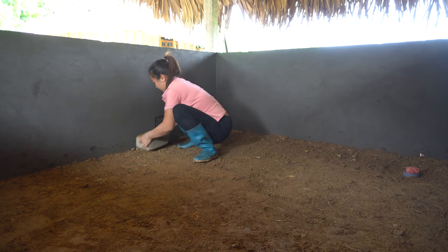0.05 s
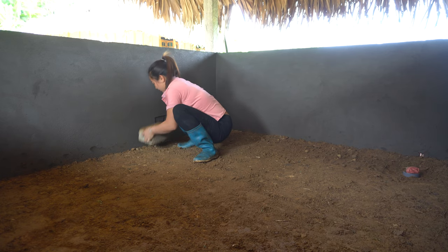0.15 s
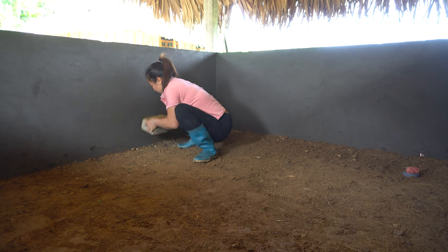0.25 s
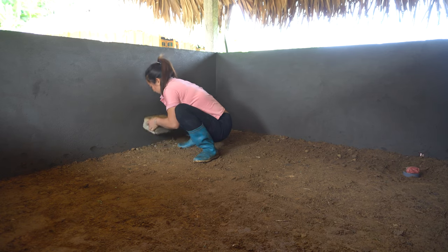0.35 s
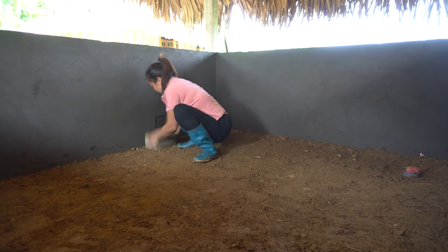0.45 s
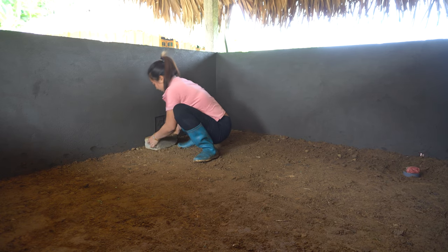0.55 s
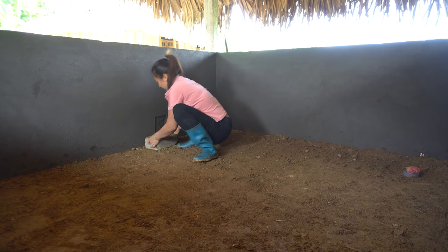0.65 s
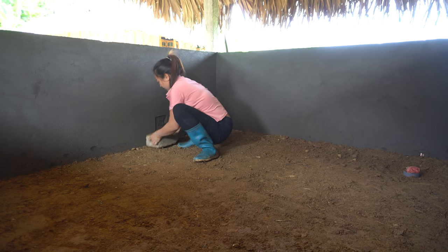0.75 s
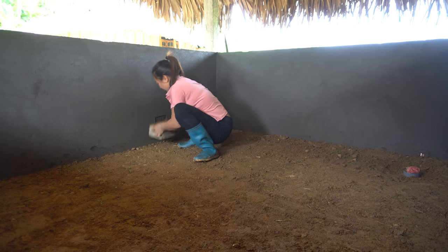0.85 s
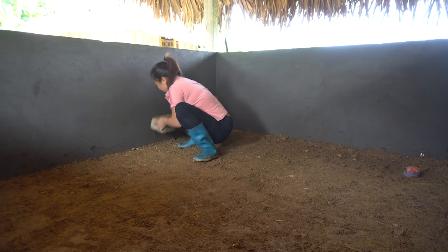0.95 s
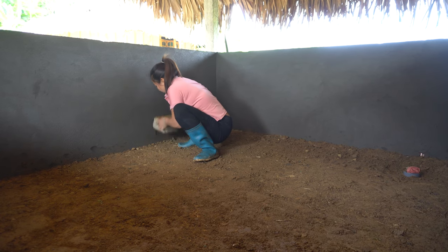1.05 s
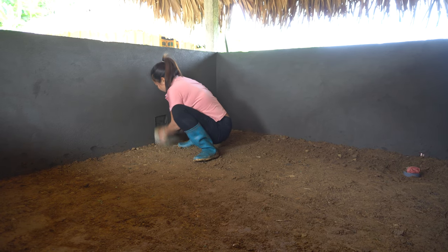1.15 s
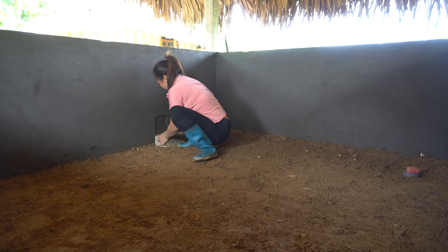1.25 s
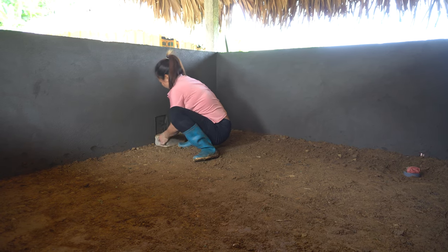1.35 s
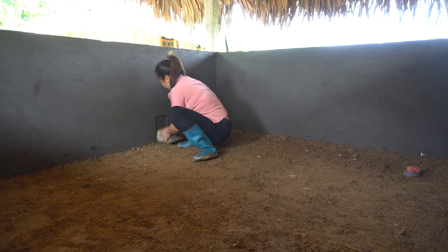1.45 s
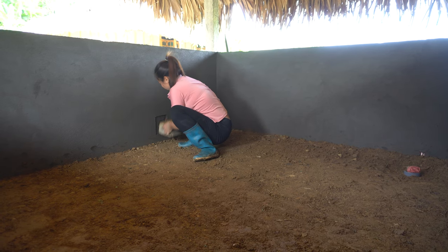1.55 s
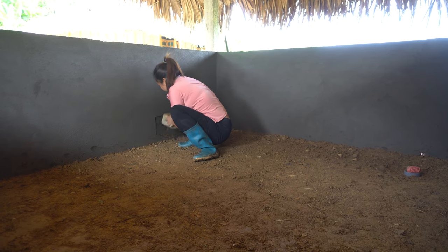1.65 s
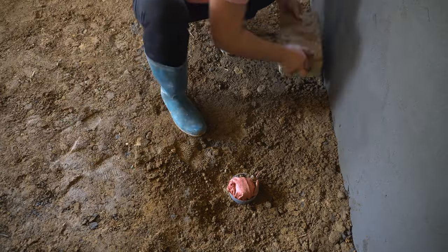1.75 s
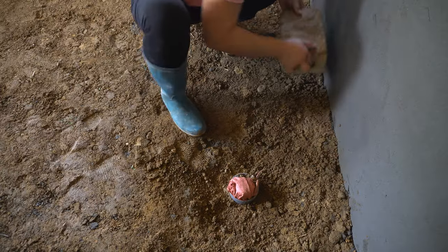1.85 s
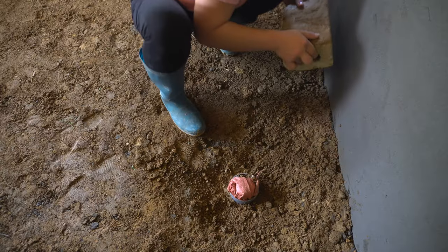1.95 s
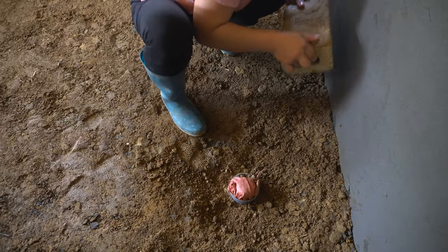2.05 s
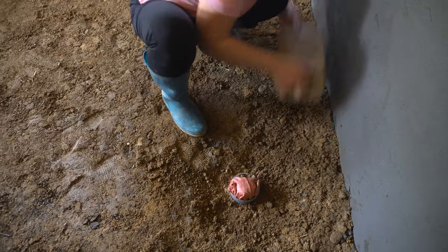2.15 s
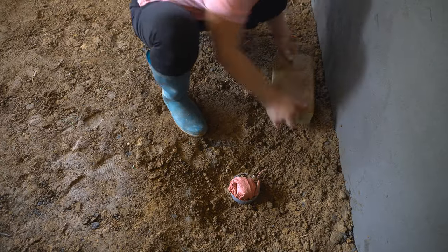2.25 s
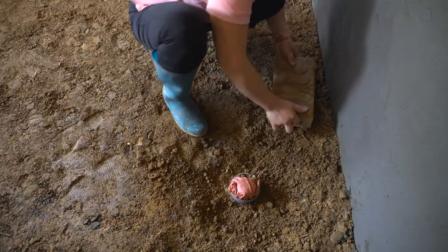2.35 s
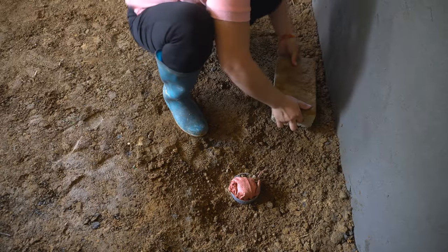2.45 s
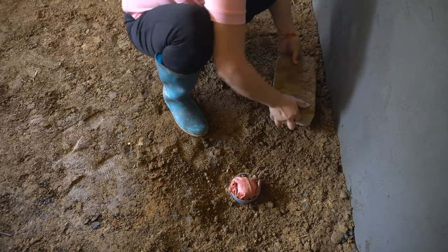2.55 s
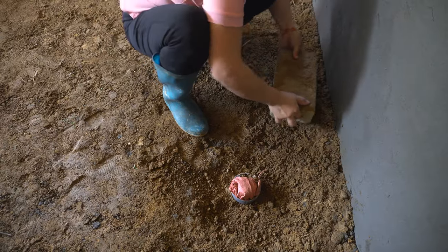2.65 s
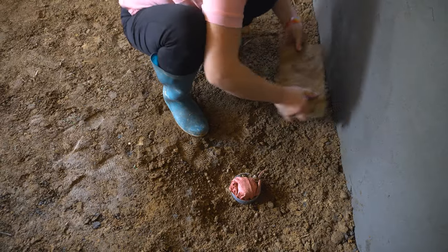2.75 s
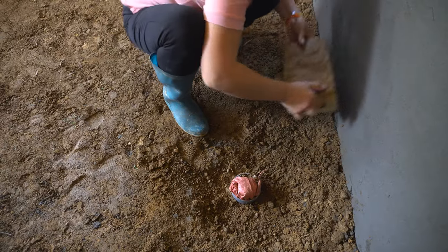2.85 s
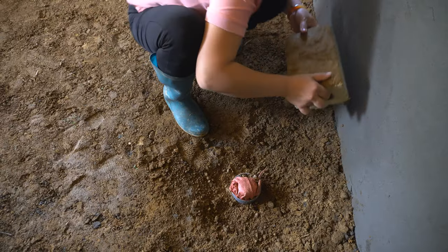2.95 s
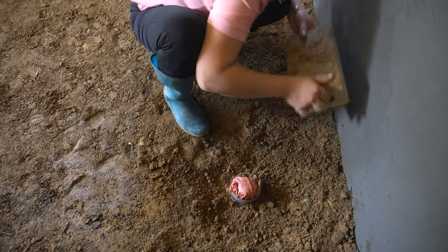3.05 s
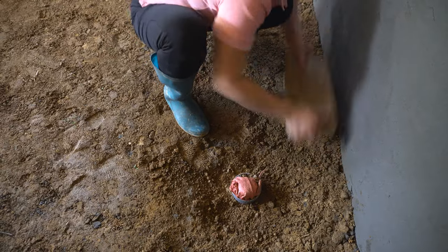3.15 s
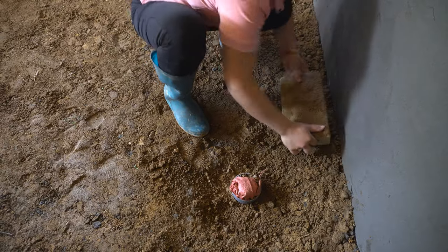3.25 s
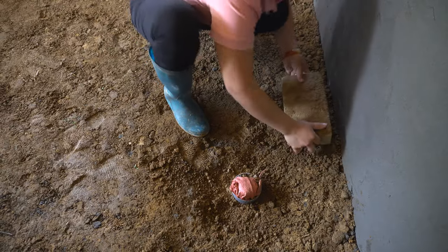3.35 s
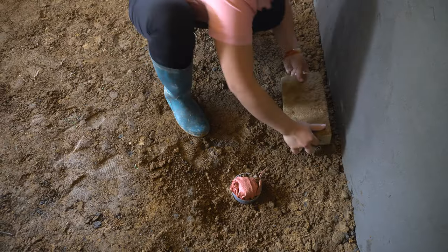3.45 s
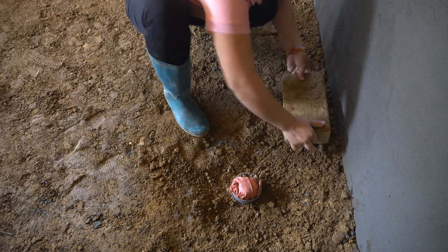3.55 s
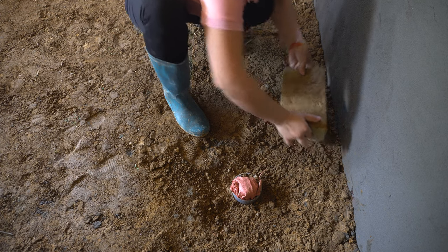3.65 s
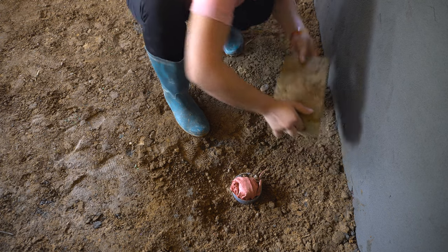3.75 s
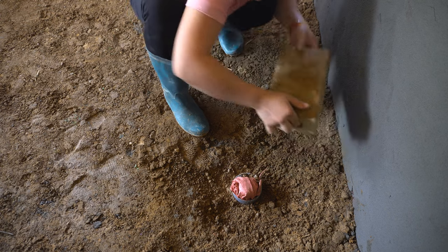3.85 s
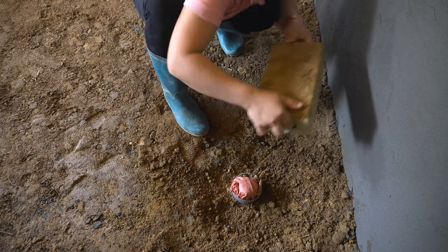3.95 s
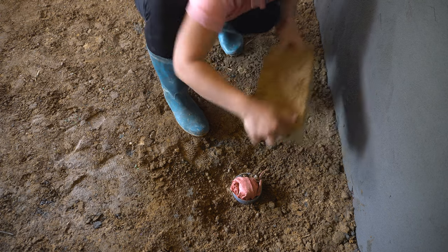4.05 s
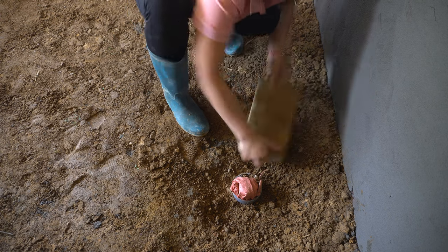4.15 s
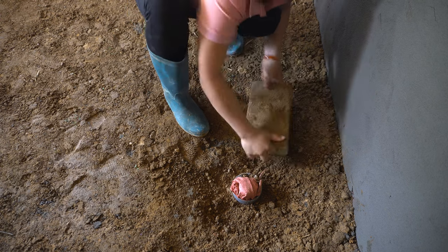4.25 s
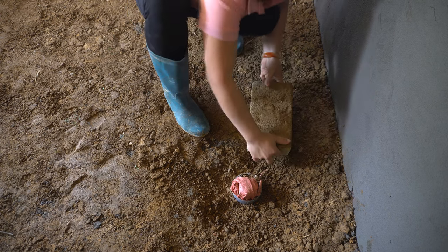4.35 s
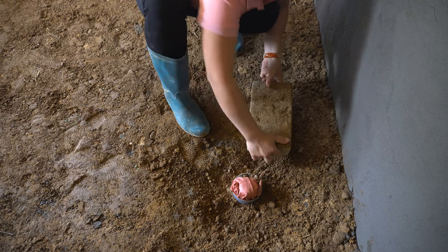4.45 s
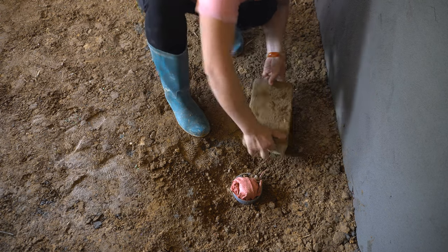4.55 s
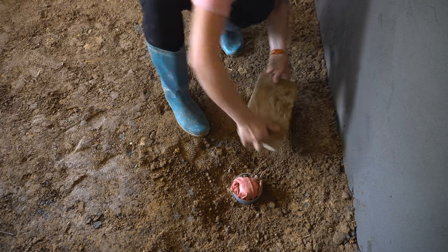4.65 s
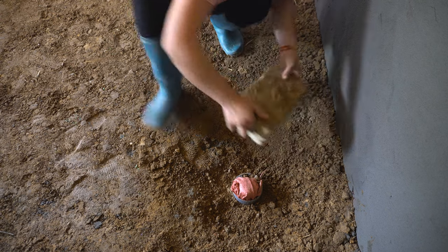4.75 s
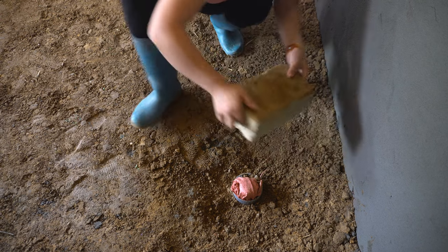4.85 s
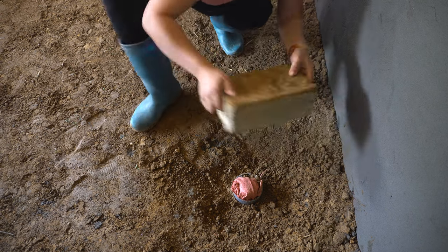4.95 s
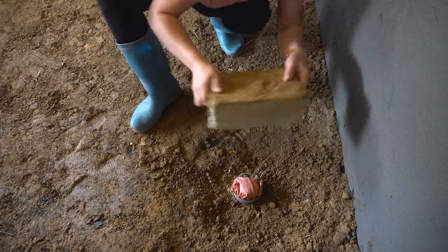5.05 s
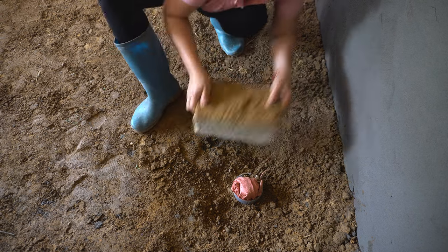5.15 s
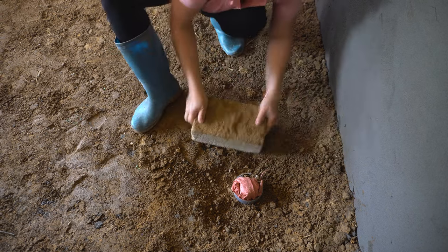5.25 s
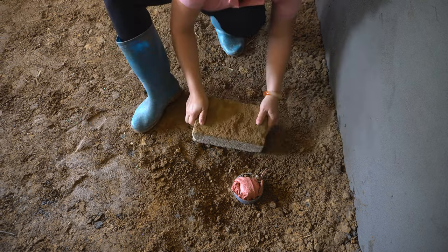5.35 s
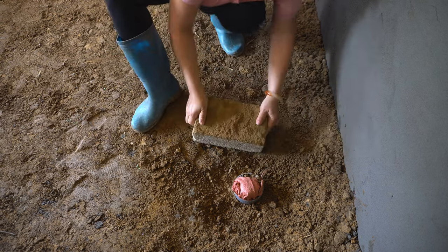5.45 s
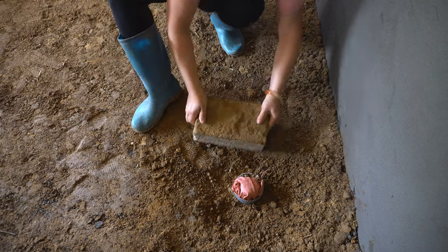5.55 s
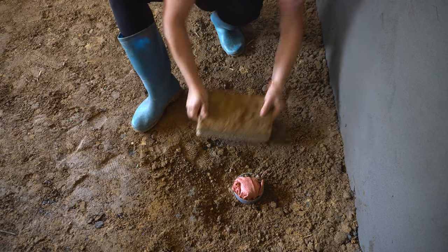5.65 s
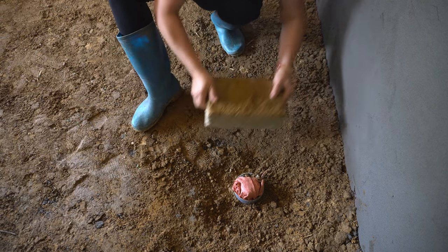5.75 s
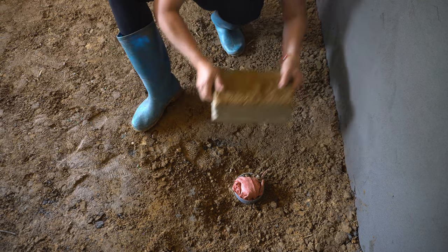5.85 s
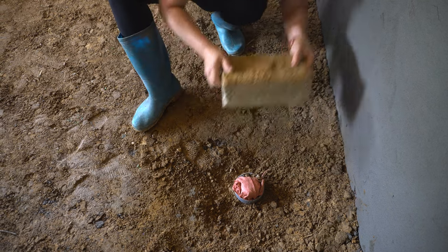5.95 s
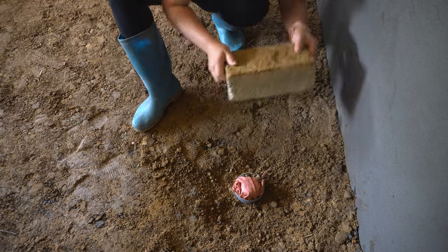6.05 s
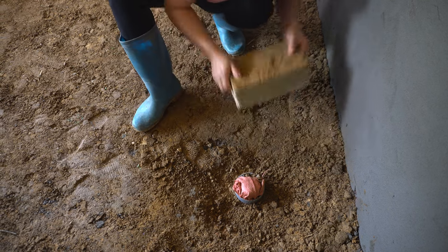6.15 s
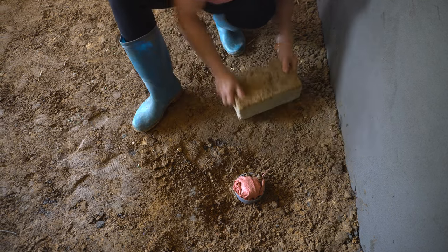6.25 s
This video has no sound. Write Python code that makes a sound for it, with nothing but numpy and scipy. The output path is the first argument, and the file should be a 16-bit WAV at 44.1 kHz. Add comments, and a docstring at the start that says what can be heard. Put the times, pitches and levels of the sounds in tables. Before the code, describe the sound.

A brick pounds bare earth six times, each a dull thump with a knock and gritty crunch, over faint birds and insects.

```python
"""Tamping an earth floor

A brick is pounded six times on bare earth in a low-walled farm building, heard twice from across the floor,
then from close by. Each impact is a ground thump, a knock and a crunch of grit, reflected by the walls. Between
blows clothes and loose dirt rustle. Birds and insects trill outside over a soft hiss, and short gusts buffet
the microphone. The sound drops out for an instant where the listening place changes."""
import sys
import numpy as np
from scipy import signal
from scipy.fft import rfft, irfft, next_fast_len
from scipy.io import wavfile
from scipy.ndimage import uniform_filter1d

SR = 44100
rng = np.random.default_rng(int(sys.argv[2]) if len(sys.argv) > 2 else 0)


def digitize_waveform(pressure):
    """Quantize a signal to 16-bit integers and store it at the path in sys.argv[1].

    Rows of a 2-D input are taken as channels; values are limited to [-1, 1].
    """
    field = np.atleast_2d(pressure).T
    bounded = np.clip(field, -1, 1)
    quanta = np.round(bounded * 32767).astype(np.int16)
    wavfile.write(sys.argv[1], SR, quanta)


N = 277367
TIME = np.arange(N) / SR
DROPOUT_START_S, DROPOUT_END_S, DROPOUT_DB = 1.791, 1.829, -56


def amp(db):
    """Amplitude ratio of a level in decibels."""
    return 10 ** (np.asarray(db) / 20)


def unit(x):
    """Normalisation to rms 1."""
    return x / np.sqrt(np.mean(x ** 2) + 1e-20)


def read(points, hz):
    """Interpolation of (frequency, value) points on a logarithmic frequency axis."""
    f, value = np.transpose(points)
    return np.interp(np.log(hz + 1), np.log(f + 1), value)


def add(mix, start_s, sound):
    """Superposition: a sound joins the mix at start_s."""
    start = round(start_s * SR)
    sound = sound[..., max(-start, 0):]
    part = mix[:, max(start, 0):][:, :sound.shape[-1]]
    part += sound[..., :part.shape[1]]


def noise(size):
    """Two uncorrelated white noises."""
    return rng.standard_normal((2, size))


def grains(size, spread_db):
    """Granular noise: dense tiny clicks of very uneven size."""
    return noise(size) * amp(spread_db * np.minimum(rng.exponential(1, size), 5))


def wander(size, span):
    """Random modulation: noise averaged over span samples, with rms near 1."""
    return unit(uniform_filter1d(rng.standard_normal(SR), span))[:size]


def colour(pair, spectrum, width, tilt=0):
    """Mid-side filtering into left and right at rms 1; tilt is in dB per octave above 300 Hz."""
    size = pair.shape[1]
    padded = next_fast_len(size)
    hz = np.fft.rfftfreq(padded, 1 / SR)
    octaves = np.log2(np.maximum(hz, 300) / 3000)
    mid, side = rfft(pair, padded) * amp(read(spectrum, hz) + tilt * octaves)
    side = side * amp(read(width, hz))
    return unit(irfft(np.array([mid + side, mid - side]), padded)[:, :size])


# reverberation time of the building: frequency_hz, t60_s
ROOM_T60 = [(100, 0.1), (400, 0.33), (1000, 0.19), (3000, 0.18), (8000, 0.17), (16000, 0.069)]
def in_room(dry, wet_db):
    """Reverberation: plastered walls add a diffuse tail to the direct sound, longest near 400 Hz."""
    size = SR // 2
    taps = np.sign(noise(size)) * (rng.random((2, size)) < .1)
    hz, t, bands = signal.stft(taps, SR, nperseg=256)
    decay = amp(-60 * t / read(ROOM_T60, hz)[:, None])
    onset = 1 - np.exp(-t / 0.0078)
    tail = signal.istft(bands * decay * onset, SR, nperseg=256)[1]
    tail = colour(tail, [(1, 0), (SR, 0)], width=[(100, -36), (600, -10.0), (3000, -2)])
    tail /= np.sqrt(tail.shape[1])
    return dry + amp(wet_db) * signal.fftconvolve(dry.mean(0)[None], tail, axes=1)[:, :N]


# spectrum of the outdoor hiss: frequency_hz, level_db
HISS_SPECTRUM = [(15, -21), (30, -0.5), (110, -1), (200, -10), (300, -11), (550, -13), (1000, -17),
                 (2200, -17.5), (3800, -21), (6000, -25.5), (10000, -28), (14400, -33.5), (16000, -33.5)]
# stereo width of hiss and rustling: frequency_hz, side_over_mid_db
DIFFUSE_WIDTH = [(60, -37.5), (180, -11), (550, -4), (1650, -4.5), (4970, -1), (15000, -3)]
# slow course of the hiss: time_s, level_db, tilt_db_per_octave
HISS_COURSE = [(0, -53.3, 0.62), (1.1, -53, 0.5), (1.75, -54.5, 0.74), (1.9, -52.5, 0.02),
               (4.0, -52.5, -0.03), (4.5, -51, -0.03), (6.29, -51, 0.38)]
def outdoor_hiss():
    """Ambient noise: a broadband hiss drifts slowly in level and spectral slope."""
    time_s, level_db, tilt = np.transpose(HISS_COURSE)
    hz, t, bands = signal.stft(colour(noise(N), HISS_SPECTRUM, DIFFUSE_WIDTH), SR, nperseg=1024)
    patches = uniform_filter1d(rng.standard_normal(bands.shape[1:]), 16, axis=0)
    flicker_db = 1.3 * unit(uniform_filter1d(patches, 8, axis=1))
    octaves = np.log2((hz[:, None] + 100) / 500)
    gain_db = np.interp(t, time_s, level_db) + np.interp(t, time_s, tilt) * octaves + flicker_db
    return signal.istft(bands * amp(gain_db), SR, nperseg=1024)[1][:, :N]


# partials of a distant hum: pitch_hz, level_db
HUM_PARTIALS = [(258, -68), (522, -77)]
def far_hum():
    """Frequency modulation: two faint partials waver together, entering after the dropout."""
    drift = 1 + 0.0049 * unit(uniform_filter1d(rng.standard_normal(N), 6000))
    phase_per_hz = 2 * np.pi * np.cumsum(drift) / SR
    hum = sum(amp(db) * np.sqrt(2) * np.sin(hz * phase_per_hz) for hz, db in HUM_PARTIALS)
    return hum * (TIME > DROPOUT_END_S)


# two distant callers: pitch_hz, notes_per_s, slide_fraction, pulse_exponent
HIGH_VOICE, LOW_VOICE = (4780, 23, 0.11, 1.6), (4200, 17, 0.012, 0.4)
# trills of birds and insects: start_s, end_s, caller, level_db
TRILLS = [(0.005, 0.08, LOW_VOICE, -61), (1.031, 1.418, LOW_VOICE, -61), (1.858, 2.066, HIGH_VOICE, -58),
          (2.919, 3.393, HIGH_VOICE, -61), (3.27, 3.54, LOW_VOICE, -63.5), (3.86, 4.54, HIGH_VOICE, -60),
          (4.628, 4.9, LOW_VOICE, -63.5), (5.08, 5.57, HIGH_VOICE, -61), (5.93, 6.27, LOW_VOICE, -65),
          (6.06, 6.29, HIGH_VOICE, -59.5)]
def trills():
    """Amplitude and frequency modulation: each note of a trill swells as its pitch arches."""
    out = np.zeros((2, N))
    for start_s, end_s, (hz, rate, slide, exponent), level_db in TRILLS:
        t = np.arange(0, end_s - start_s, 1 / SR)
        note = np.sin(np.pi * rate * t) ** 2
        pitch_hz = hz * (1 + slide * (note - .7) + .014 * wander(len(t), span=70))
        flutter_db = 2.5 * wander(len(t), span=400)
        envelope = amp(level_db + flutter_db) * note ** exponent * signal.windows.tukey(len(t), .12)
        add(out, start_s, envelope * np.sin(2 * np.pi * np.cumsum(pitch_hz) / SR))
    return out


# rising bird chirps: start_s, start_pitch_hz, level_db
CHIRPS = [(1.804, 4070, -52.5), (4.148, 3780, -54.5)]
def chirps(length_s=0.0905, rise_fraction=0.17):
    """Frequency sweep: a bird's note glides upward, made raspy by pitch jitter."""
    out, size = np.zeros((2, N)), int(length_s * SR)
    for start_s, hz, level_db in CHIRPS:
        jitter = 1 + 0.046 * wander(size, span=50)
        pitch_hz = hz * np.linspace(1, 1 + rise_fraction, size) * jitter
        add(out, start_s, amp(level_db) * np.sin(2 * np.pi * np.cumsum(pitch_hz) / SR) * np.hanning(size))
    return out


def add_air_puff(mix, start_s, swell, edge_hz):
    """Turbulence: low-frequency pressure fluctuations follow a swell and carry its energy."""
    margin = SR // 10
    pressure = np.pad(rng.standard_normal(len(swell)) * swell, margin)
    hz = np.fft.rfftfreq(len(pressure), 1 / SR)
    highpass = hz ** 3 / (hz ** 3 + 42 ** 3)
    lowpass = 1 / np.sqrt(1 + (hz / edge_hz) ** 7.96)
    puff = irfft(rfft(pressure) * highpass * lowpass, len(pressure))
    add(mix, start_s - margin / SR, puff * np.linalg.norm(swell) / np.linalg.norm(puff))


# gusts on the microphone: peak_s, level_db, rise_s, fall_s, upper_edge_hz
GUSTS = [(0.38, -38, 0.1, 0.04, 118), (0.475, -39, 0.018, 0.02, 100), (0.86, -42.5, 0.15, 0.11, 112),
         (1.5, -51, 0.2, 0.25, 105), (4.908, -30.5, 0.01, 0.06, 112), (5.03, -25, 0.03, 0.022, 225),
         (5.165, -22, 0.09, 0.018, 135), (5.258, -34, 0.06, 0.04, 91.5), (5.56, -37.5, 0.011, 0.012, 165),
         (5.88, -48, 0.05, 0.05, 97), (6.21, -27, 0.032, 0.03, 105), (6.28, -33, 0.025, 0.03, 145)]
def gusts(churn_db=2.0):
    """Wind noise: each gust swells, churns and falls, pressing on both microphone ports alike."""
    out = np.zeros((2, N))
    for peak_s, level_db, rise_s, fall_s, edge_hz in GUSTS:
        t = np.arange(-2 * rise_s, 2 * fall_s, 1 / SR)[:SR]
        swell = np.exp(-(t / np.where(t < 0, rise_s, fall_s)) ** 2)
        churn = unit(amp(churn_db * wander(len(t), span=800)))
        add_air_puff(out, peak_s + t[0], amp(level_db) * swell * churn, edge_hz)
    return out


# spectrum of small contacts in cloth, soil and pebbles: frequency_hz, level_db
FINE_SPECTRUM = [(300, -16), (1200, -0.5), (3000, 3.5), (6000, 1), (11000, -3.5), (16000, -12)]
def add_rustle(mix, middle_s, level_db, length_s, tilt):
    """Friction noise: many tiny contacts merge into one smooth swell."""
    size = int(length_s * SR)
    friction = colour(grains(size, spread_db=4.0), FINE_SPECTRUM, DIFFUSE_WIDTH, tilt)
    add(mix, middle_s - length_s / 2, amp(level_db) * friction * np.hanning(size))


# soft rustles of sleeves and loose dirt: middle_s, level_db, length_s, tilt_db_per_octave
LIFT_RUSTLES = [(2.893, -53.5, 0.27, -0.7), (3.77, -51, 0.17, -1.5), (4.321, -43.5, 0.089, -6),
                (4.921, -48.5, 0.09, -0.5), (5.884, -48.5, 0.15, 0)]
# swishes of clothing: middle_s, level_db
SWISHES = [(3.15, -57.5), (4.127, -56), (4.83, -56), (6.11, -59)]
def rustles():
    """Friction: sleeves and loose dirt rustle as the brick is lifted; clothes swish as the arms swing."""
    out = np.zeros((2, N))
    for rustle in LIFT_RUSTLES:
        add_rustle(out, *rustle)
    for middle_s, level_db in SWISHES:
        add_rustle(out, middle_s, level_db, length_s=0.21, tilt=8.5)
    return in_room(out, wet_db=-7)


# stereo width of impacts: frequency_hz, side_over_mid_db
IMPACT_WIDTH = [(100, -52), (500, -17), (1500, -14.5), (4000, -2), (10000, -3.5)]
# pebble strikes: start_s, level_db, decay_s, tilt_db_per_octave
PEBBLE_TICKS = [(1.5345, -38, 0.003, -1), (4.2966, -36, 0.003, -3), (4.582, -40.5, 0.004, 2)]
def pebbles():
    """Brief contact gives a broad spectrum: small stones snap against the brick."""
    out, t = np.zeros((2, N)), np.arange(SR // 20) / SR
    for start_s, level_db, decay_s, tilt in PEBBLE_TICKS:
        snap = colour(noise(len(t)), FINE_SPECTRUM, IMPACT_WIDTH, tilt)
        add(out, start_s, amp(level_db) * snap * np.exp(-t / decay_s))
    return in_room(out, wet_db=-14)


# standing waves between the walls: pitch_hz, level_db, t60_s
WALL_MODES = [(101.1, 6, 0.38), (161.5, -15.5, 0.24), (197.8, -10.5, 0.71), (245, 3, 0.15),
              (316.6, -5, 0.47), (429.5, -7, 0.34), (477, -5, 0.27), (535, -15, 0.39), (630, -41, 0.09)]
def wall_modes(t, tilt):
    """Resonance: standing waves build up and die away; tilt weights the higher ones."""
    ringing = np.zeros(len(t))
    for pitch_hz, level_db, t60_s in WALL_MODES:
        octaves = np.log2(pitch_hz / WALL_MODES[0][0])
        ringing += amp(level_db + tilt * octaves - 60 * t / t60_s) * np.sin(2 * np.pi * pitch_hz * t)
    return ringing * (1 - np.exp(-t / 0.013))


# spectrum of the building's boom: frequency_hz, level_db
BOOM_SPECTRUM = [(25, -10), (60, 6.5), (130, 1.5), (230, 0.5), (340, -6.5), (450, -9), (750, -21.5),
                 (1200, -26), (4000, -69)]
def boom(t, tilt):
    """Modal overlap: the weaker standing waves merge into a dull, decaying noise."""
    envelope = (1 - np.exp(-t / 0.0063)) * np.exp(-t / 0.049)
    return colour(noise(len(t)), BOOM_SPECTRUM, IMPACT_WIDTH, tilt) * envelope


def contact(t, decay_s):
    """Contact force of one edge biting into soil: it builds as crumbs give way, then decays."""
    t = np.maximum(t, 0)
    bite = 1 - np.exp(-(t / .0016) ** 1.5)
    return bite * np.exp(-t / decay_s)


# spectrum of crushed grit: frequency_hz, level_db
GRIT_SPECTRUM = [(200, -29), (800, -11), (1600, 5.5), (3200, -1), (4500, -6), (7000, -11), (11000, -14),
                 (16000, -22)]
def grit(t, decay_s, second_s, second_db, tilt, firm_decay_s=0.012):
    """Granular crushing under two contacts: loose soil crunches longer and brighter than firm soil."""
    force = contact(t, decay_s) + amp(second_db - 8.5) * contact(t - second_s, decay_s / 2)
    loose_tilt = 1.7 * np.log2(decay_s / firm_decay_s)
    crunch = colour(grains(len(t), spread_db=3.5), GRIT_SPECTRUM, IMPACT_WIDTH, tilt + loose_tilt)
    return unit(crunch * force)


# spectrum of the broad knock: frequency_hz, level_db
KNOCK_SPECTRUM = [(80, -27), (180, -1.5), (320, -3), (450, 2.5), (680, -2), (1000, -5.5), (1500, -14.5),
                  (2200, -18.5), (5000, -41)]
# resonance peak around the clack pitch: frequency_ratio, level_db
CLACK_PEAK = [(.4, -32), (.7, -10), (.88, -0.5), (1.12, 0.5), (1.35, -27), (2.2, -47)]
def brick(t, clack_hz, knock_db, second_s, second_db):
    """Heavy damping: hands and soil stop the brick ringing, so clack and knock follow the force."""
    force = contact(t, .005) + amp(second_db) * contact(t - second_s, 0.0046)
    knock = unit(colour(noise(len(t)), KNOCK_SPECTRUM, IMPACT_WIDTH) * force)
    clack_spectrum = np.array(CLACK_PEAK) * [clack_hz, 1]
    clack = unit(colour(noise(len(t)), clack_spectrum, IMPACT_WIDTH) * force)
    return clack + amp(knock_db) * knock


def ground_thump(t, pitch_hz, length_s):
    """Radiation from a moving surface: packed earth bounces a few cycles; the air follows its velocity."""
    envelope = (1 - np.exp(-(t / 0.0035) ** 2)) * np.exp(-(t / length_s) ** 8.2)
    displacement = np.cos(2 * np.pi * pitch_hz * t) * envelope
    return np.gradient(displacement, t) / (2 * np.pi * pitch_hz)


# listening places: thump_length_s, echo_delay_s, knock_over_clack_db, second_edge_db,
# grit_tilt_db_per_octave, squeezed_air_over_thump_db, left_over_right_db
FAR = (0.046, 0.063, -6.5, 2.5, -1.0, -10, 1.7)  # across the floor
NEAR = (0.019, 0.07, 5, 0, 3.4, -22, -1)  # just above the brick
# the thump's echo on each trip across the building: level_db
ECHO_LEVELS = [-10.5, -26]
# blows of the brick: start_s, place, thump_db, thump_hz, clack_db, clack_hz, second_edge_delay_s,
# grit_db, grit_decay_s, boom_db, boom_tilt_db_per_octave, modes_db
BLOWS = [(0.518, FAR, -9.3, 105.7, -39.5, 730, 0.006, -40, 0.015, -28.5, 4, -53),
         (1.2092, FAR, -9.3, 107, -41.5, 760, 0.003, -41.5, 0.011, -17.5, -2.5, -25.5),
         (2.2791, NEAR, -11.3, 116, -39, 1380, 0.0096, -38.5, 0.0085, -29.5, -9, -33),
         (3.243, NEAR, -16, 150, -39.5, 700, 0.0068, -50, 0.015, -24, -3, -28),
         (4.227, NEAR, -9, 97, -52, 1060, 0.004, -42, 0.022, -26.5, -7.5, -27),
         (5.2935, NEAR, -15.5, 117, -44.5, 400, 0.004, -43.5, 0.011, -17.5, 0, -20.5)]
def tamping():
    """Impact excitation: the brick lands on one edge, then flat, driving ground, grit and building."""
    t = np.arange(SR // 2) / SR
    early = t[:len(t) // 4]
    low, sharp, crumbs = np.zeros((3, 2, N))
    for (start_s, place, thump_db, thump_hz, clack_db, clack_hz, second_s,
         grit_db, grit_decay_s, boom_db, boom_tilt, modes_db) in BLOWS:
        length_s, echo_s, knock_db, second_db, grit_tilt, squeeze_db, pan_db = place
        thump = amp(thump_db) * ground_thump(t, thump_hz, length_s)
        add(low, start_s, thump + amp(modes_db) * wall_modes(t, boom_tilt))
        for trip, echo_db in enumerate(ECHO_LEVELS, 1):
            add(low, start_s + trip * echo_s, amp(echo_db) * thump)
        # air is squeezed out from under the brick
        squeeze = amp(thump_db + squeeze_db) * np.hanning(int(0.036 * SR))
        add_air_puff(low, start_s, squeeze, edge_hz=80)
        add(low, start_s, amp(boom_db) * boom(t, boom_tilt))
        hit = amp(clack_db) * brick(early, clack_hz, knock_db, second_s, second_db)
        hit += amp(grit_db) * grit(early, grit_decay_s, second_s, second_db, grit_tilt)
        add(sharp, start_s, hit * amp([[pan_db / 2], [-pan_db / 2]]))
        if place == NEAR:  # settling crumbs are heard only from close by
            add_rustle(crumbs, start_s + 0.15, grit_db - 20.5, length_s=0.31, tilt=5.5)
    return low + in_room(sharp, wet_db=-9.5) + in_room(crumbs, wet_db=-7)


def scene():
    """Superposition of all sources, from the background to the blows."""
    background = outdoor_hiss() + far_hum() + in_room(trills() + chirps(), wet_db=-5.5)
    return background + gusts() + rustles() + pebbles() + tamping()


# phase between the microphone ports: frequency_hz, left_lead_rad
PORT_PHASE = [(30, -0.16), (120, -0.3), (1000, -0.53), (4000, -0.26), (9000, -1.3), (16000, -.85)]
def record(dry, cutoff_hz=16000):
    """Phase shift and band limiting: the left port lags slightly, and the sound drops out once."""
    padded = next_fast_len(N + 2048)
    phase = read(PORT_PHASE, np.fft.rfftfreq(padded, 1 / SR))
    shift = np.exp(.5j * np.array([phase, -phase]))
    ports = irfft(rfft(dry, padded) * shift, padded)[:, :N]
    silent = (TIME > DROPOUT_START_S) & (TIME < DROPOUT_END_S)
    dip_db = uniform_filter1d(np.where(silent, DROPOUT_DB, 0.), 200)
    lowpass = signal.firwin(511, cutoff_hz, window=("kaiser", 9), fs=SR)
    return signal.oaconvolve(ports * amp(dip_db), lowpass[None], "same")


dry = scene()
out = record(dry)
digitize_waveform(out)
```